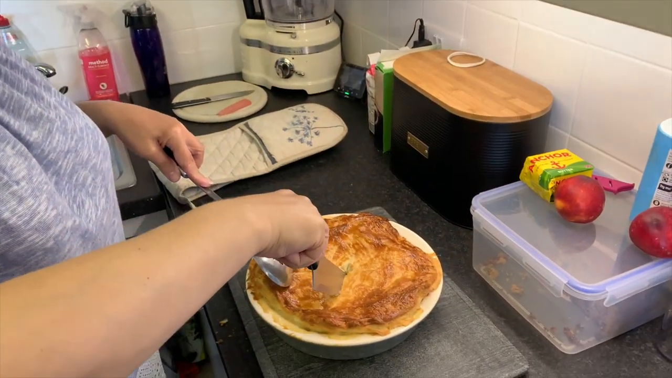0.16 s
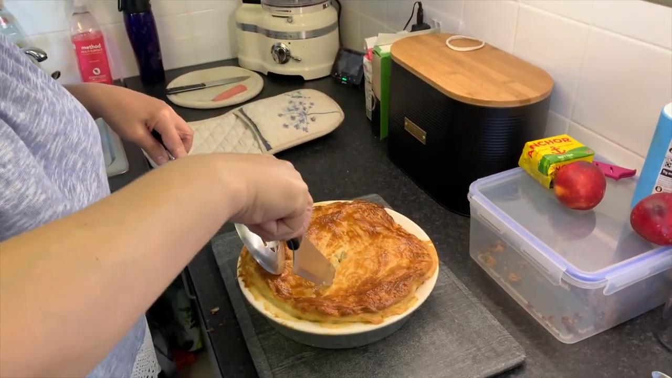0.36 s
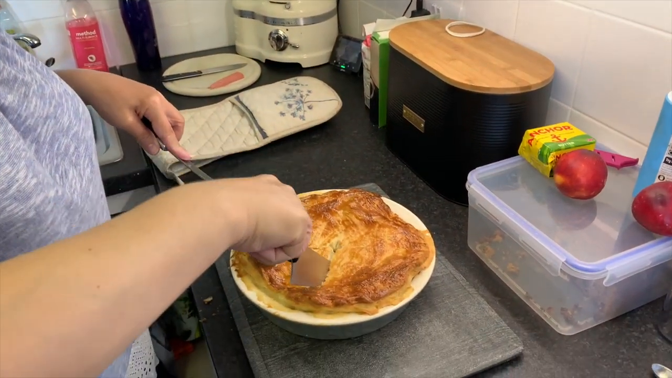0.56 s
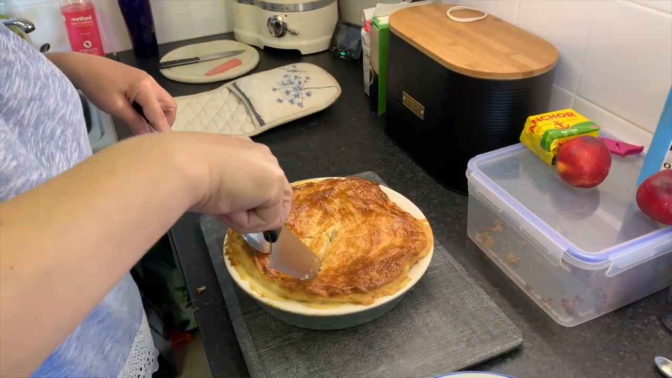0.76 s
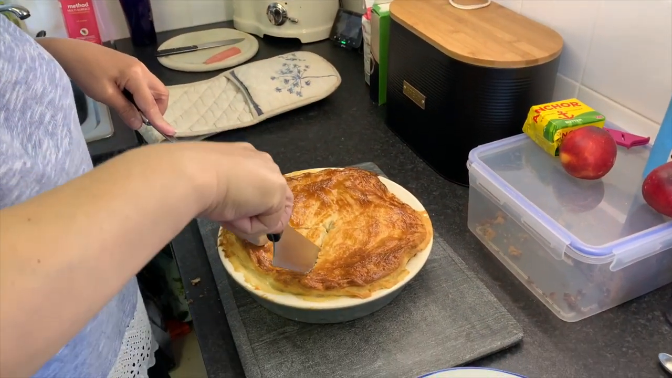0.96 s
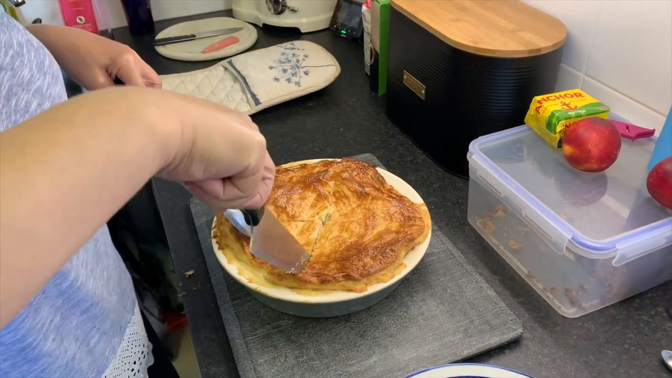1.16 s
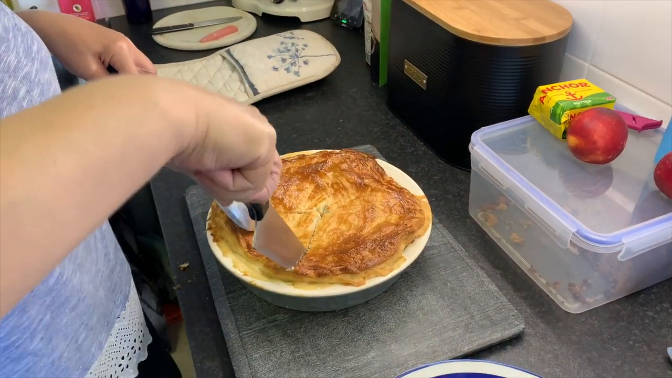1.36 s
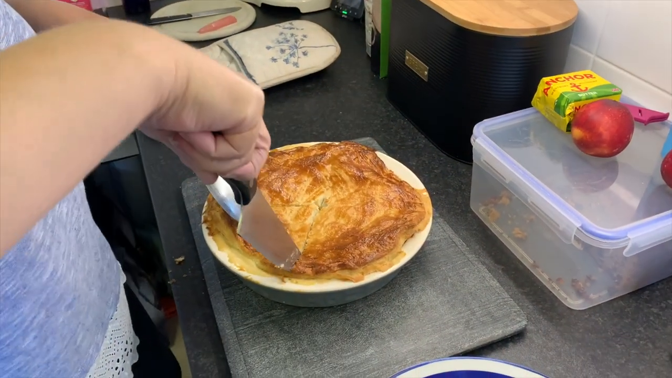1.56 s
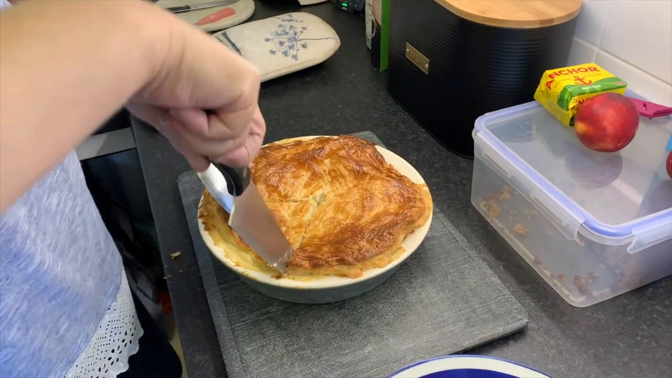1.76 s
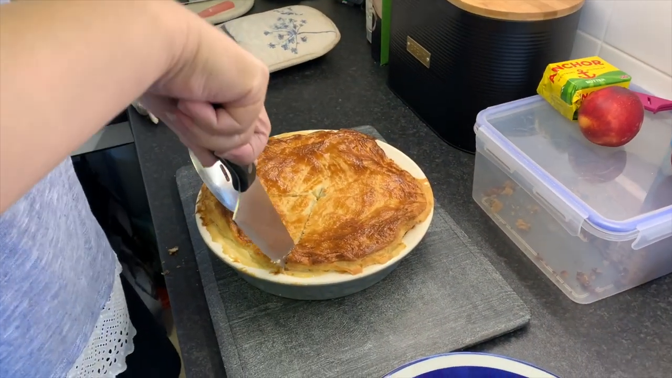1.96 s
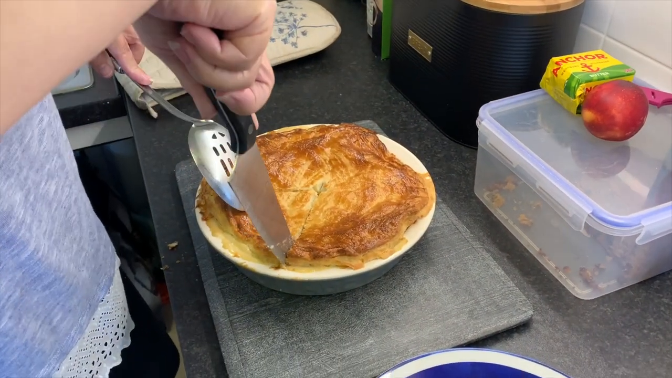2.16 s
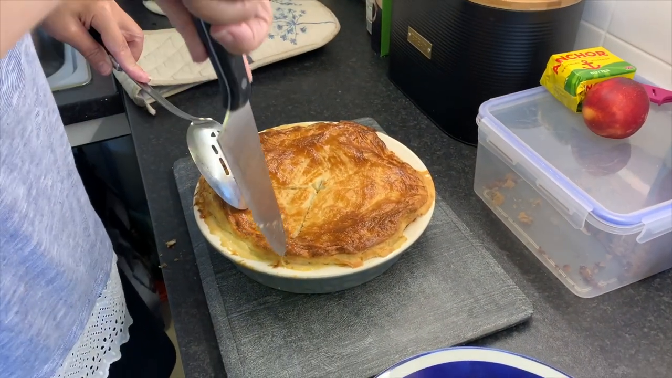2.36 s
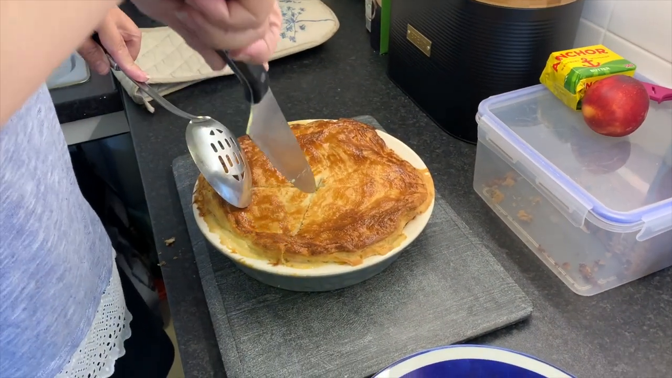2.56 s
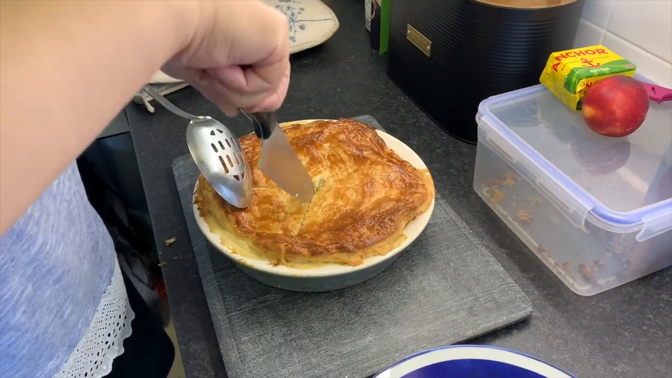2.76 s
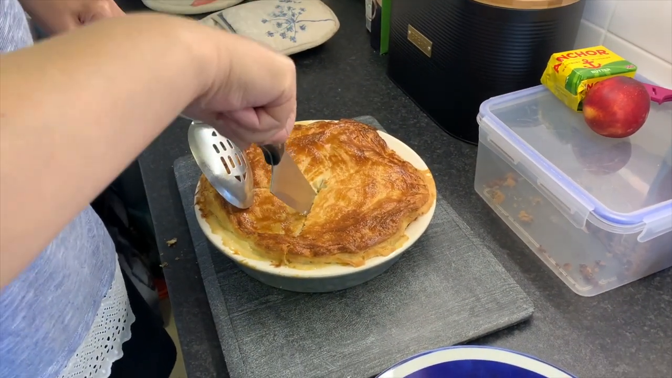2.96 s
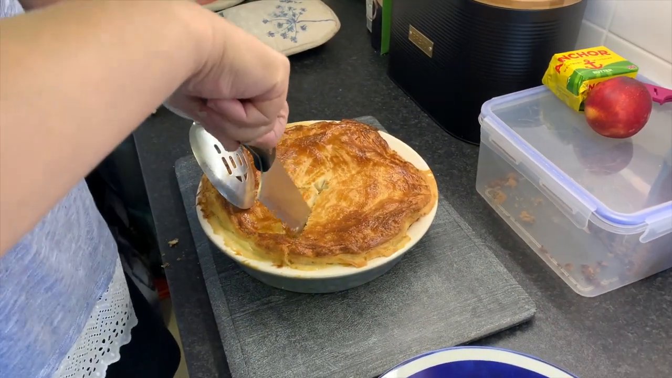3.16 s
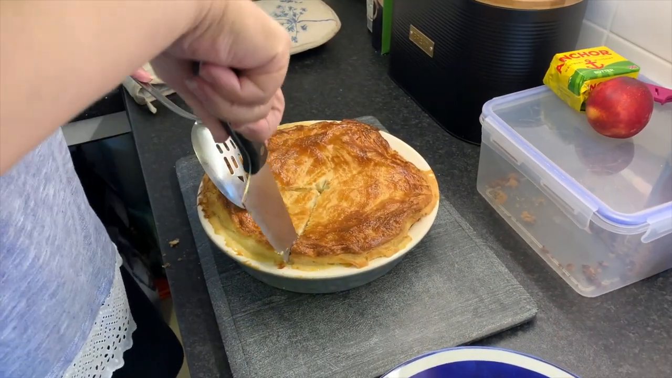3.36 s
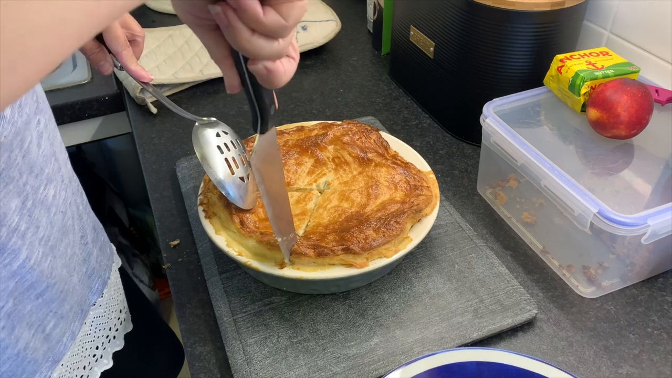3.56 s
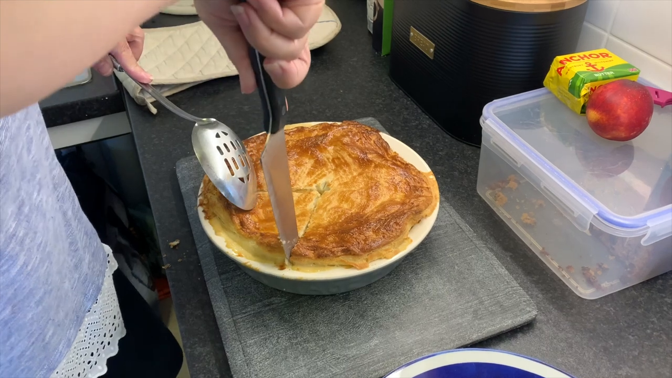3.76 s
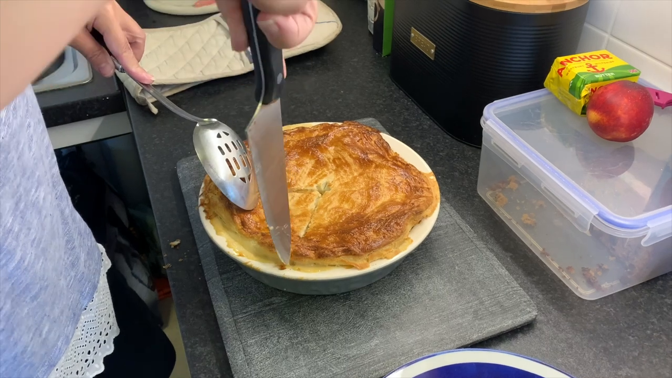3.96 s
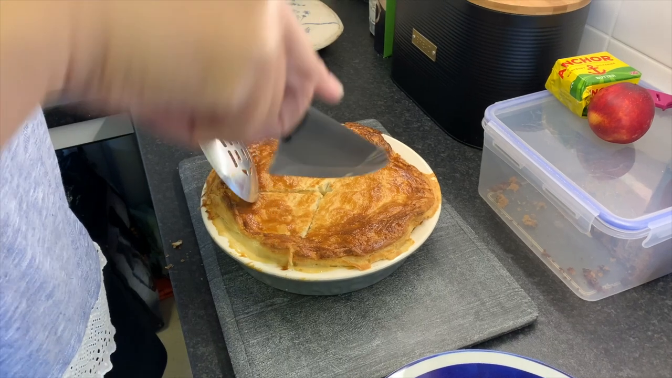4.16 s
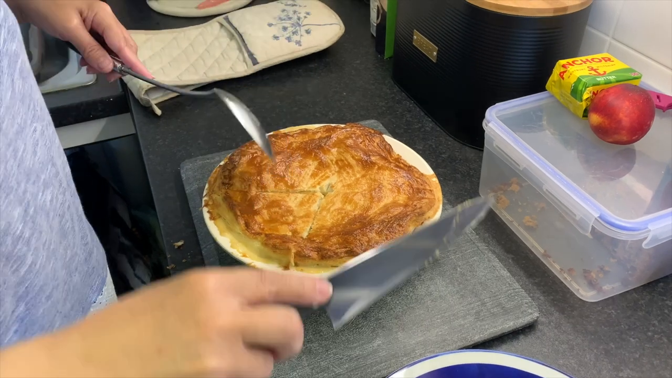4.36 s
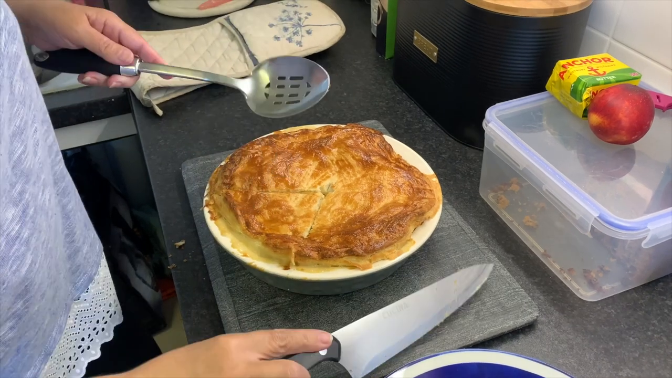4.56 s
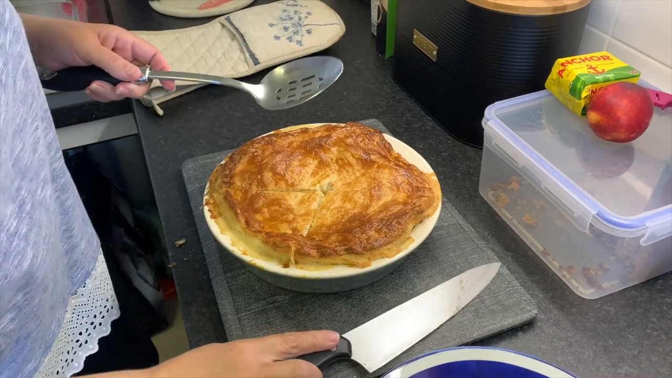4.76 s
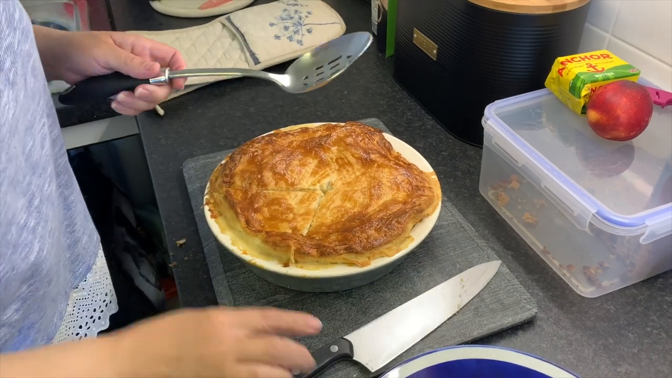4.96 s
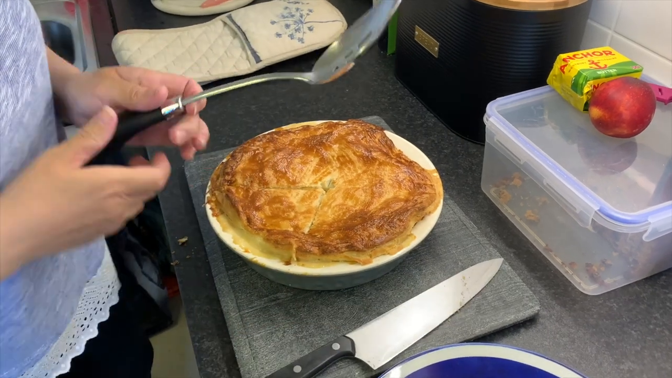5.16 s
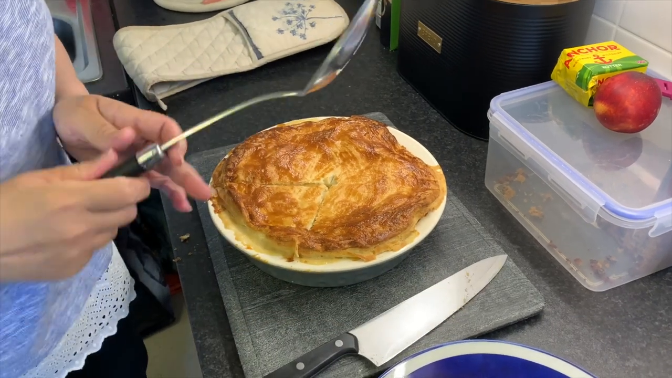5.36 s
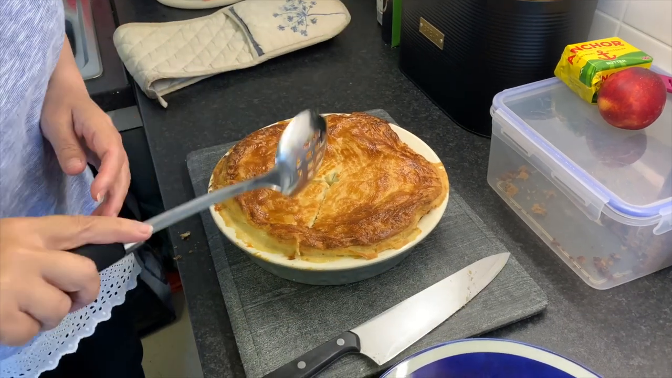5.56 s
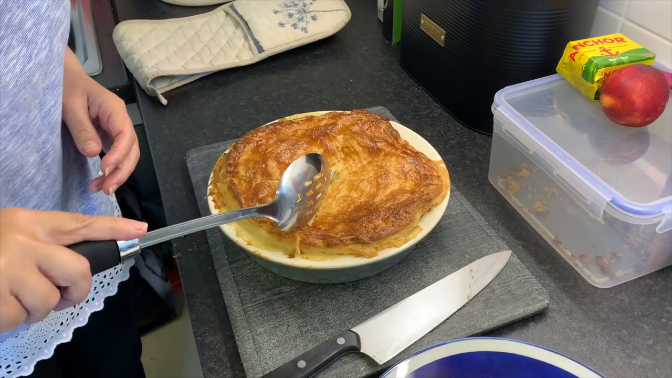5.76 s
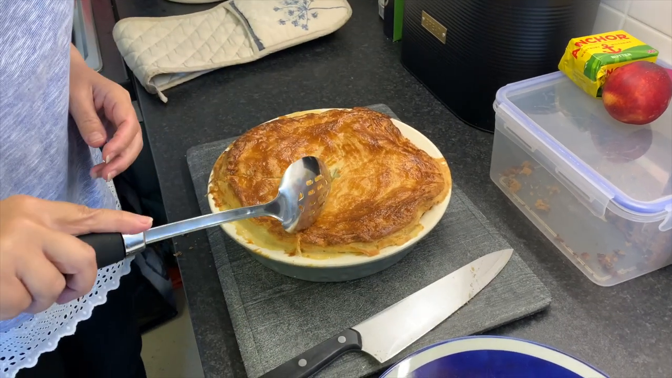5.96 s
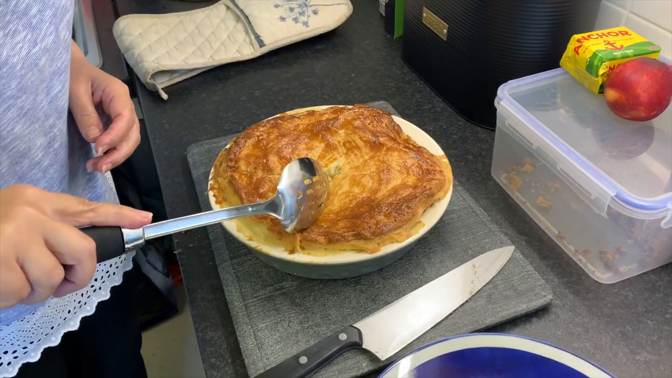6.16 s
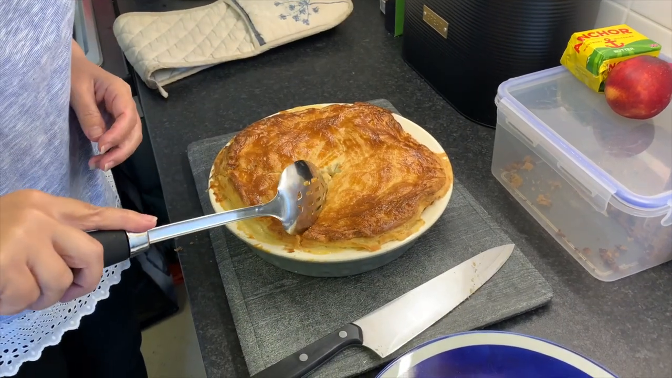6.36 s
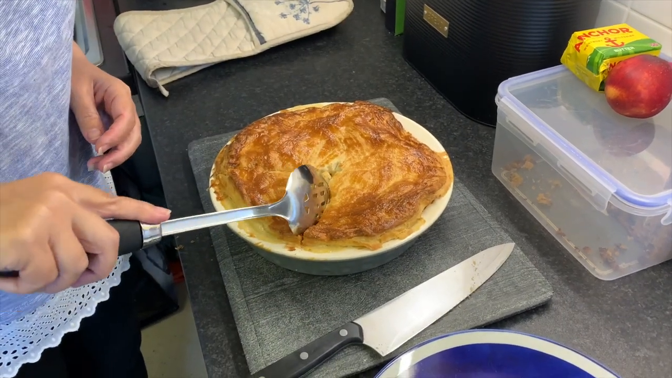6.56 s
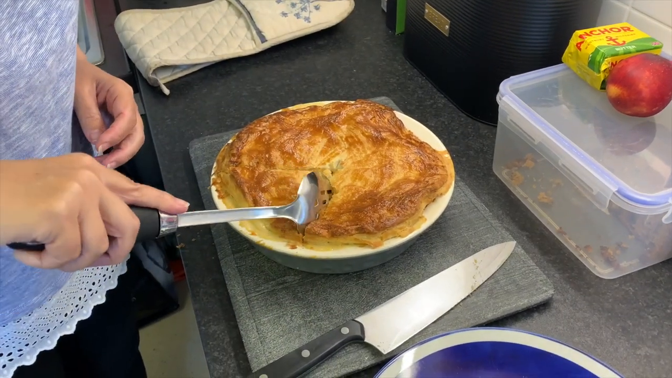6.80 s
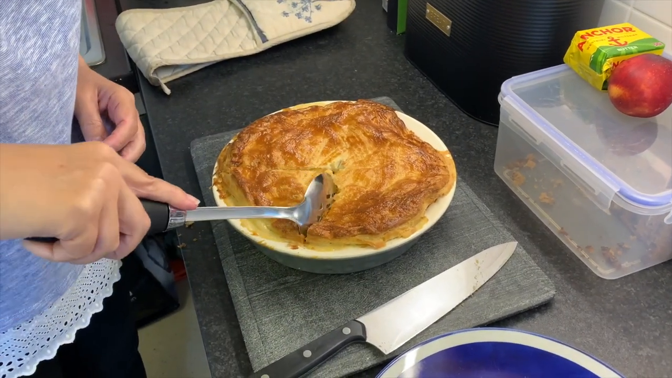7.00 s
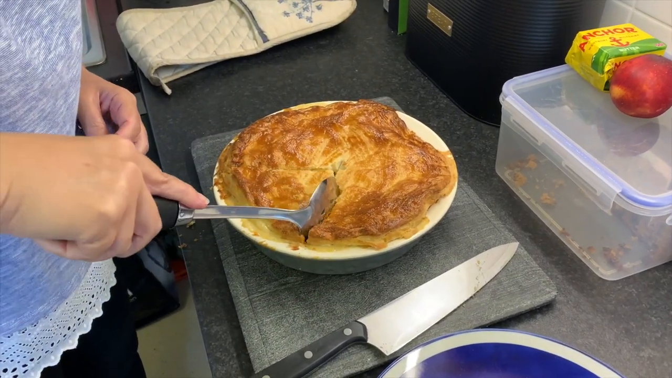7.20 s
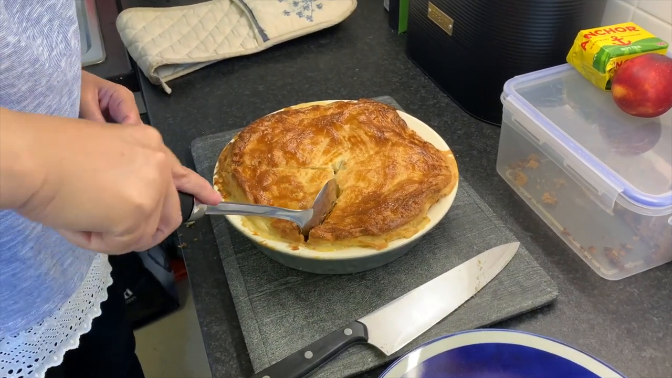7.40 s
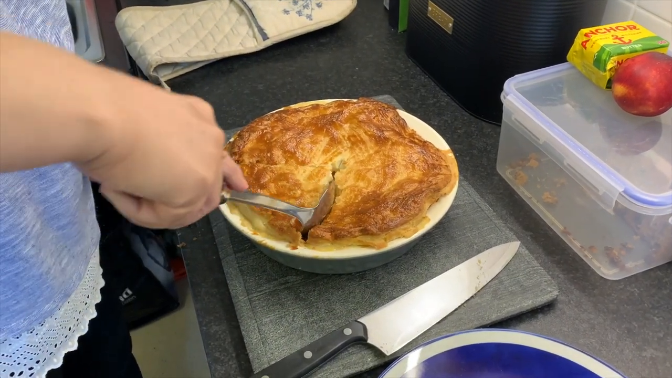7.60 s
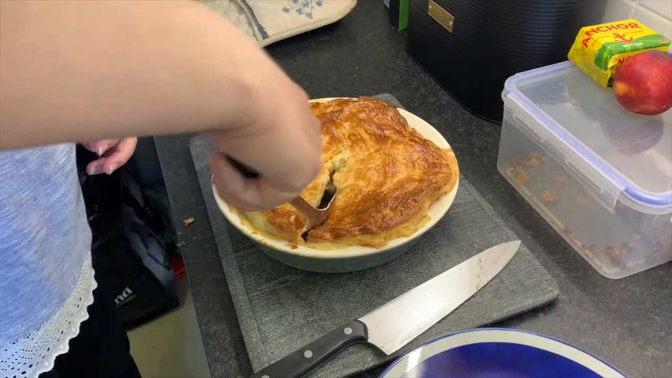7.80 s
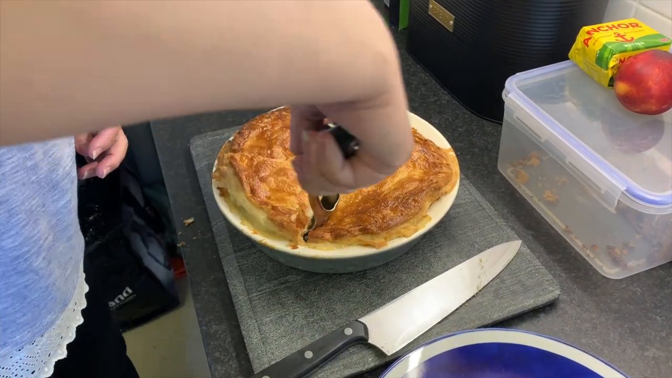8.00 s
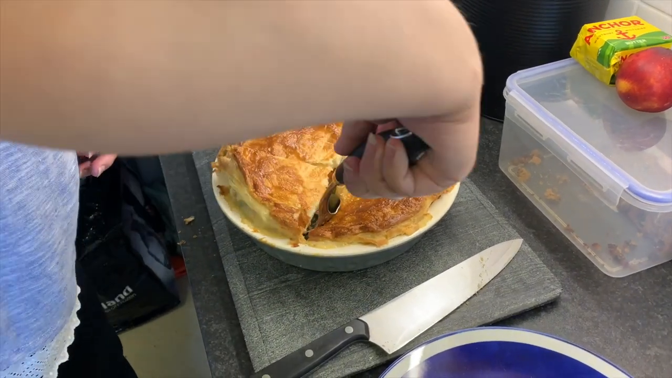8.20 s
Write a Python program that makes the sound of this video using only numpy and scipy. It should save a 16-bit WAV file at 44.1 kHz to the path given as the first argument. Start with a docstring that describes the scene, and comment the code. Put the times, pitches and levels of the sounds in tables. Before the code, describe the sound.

Close by in a kitchen with a low, steady appliance hum, a knife crunches through flaky baked pastry, each stroke ending in a knock on the ceramic dish. The blade scrapes and clicks against the dish several more times, then clatters lightly onto a cutting board. After a short pause, a metal spoon breaks into the crust with quieter, dry crackling and small snapping flakes.

```python
"""Cutting a crisp pie

A knife saws through the crust; its tip knocks and scrapes on the ceramic dish. The knife is laid on a
board, then a steel spoon breaks into the crust. Crumbs are filtered clicks, blows ring damped modes,
scrapes are stick-slip. The worktop thuds, an appliance hums, tiled walls ring briefly; two microphone
ports a little apart pick it up."""
import sys
import numpy as np
from scipy import signal
from scipy.fft import rfft, irfft
from scipy.io import wavfile
from scipy.ndimage import uniform_filter1d

SR = 44100
rng = np.random.default_rng(int(sys.argv[2]) if len(sys.argv) > 2 else 0)


def wrap_up_sound(samples):
    """Save the sound to the file named by the first command line argument, as 16-bit audio."""
    columns = np.atleast_2d(samples).T
    # keep every value between -1 and 1, then stretch to whole-number steps
    tamed = np.clip(columns, -1, 1)
    steps = np.round(tamed * 32767).astype(np.int16)
    wavfile.write(sys.argv[1], SR, steps)


N = 363384

# Spectrum of breaking crust. Each row: frequency in Hz, relative density in dB.
CRUST_SPECTRUM = [(400, -1), (2000, -1.5), (3500, -1), (6000, 0.5), (10000, 1.5), (13800, -3.5),
                  (14800, -9.5), (16000, -50)]
# Modes of the filled dish. Each row: frequency in Hz, gain in dB, t60 in seconds.
DISH_MODES = [(380.6, 6.5, 0.033), (453, 1.5, 0.054), (588, -5.5, 0.065), (689.5, -4.5, 0.097),
              (855, 0.5, 0.023), (1030, 3, 0.014), (1118.5, 2.5, 0.055), (1406, 6, 0.014),
              (1546, 10.5, 0.017), (1843, 11.5, 0.015), (2019, 9.5, 0.017), (2178, 3.5, 0.044),
              (2520, -1, 0.019), (2878, -2.5, 0.034), (3820, 5, 0.0086), (4495, 4, 0.0062),
              (6150, 4, 0.0021)]


def undb(db):
    return 10 ** (np.asarray(db) / 20)


def level(x, rms_db):
    return x * undb(rms_db) / np.sqrt(np.mean(x ** 2))


def butter(order, hz, kind="low"):
    return signal.butter(order, hz, kind, fs=SR, output="sos")


def curve(rows):
    """Gain over time from (s, dB) rows, silent outside them."""
    s, db = np.transpose(rows)
    span = np.arange(max(int(s[0] * SR), 0), min(int(s[-1] * SR), N))
    gain = np.zeros(N)
    gain[span] = undb(np.interp(span / SR, s, db))
    return gain


def colour(x, spectrum):
    """Filter by (Hz, dB) rows."""
    hz, db = np.transpose(spectrum)
    bin_hz = np.maximum(np.fft.rfftfreq(N, 1 / SR), 1)
    gain_db = np.interp(np.log(bin_hz), np.log(np.maximum(hz, 1)), db)
    return irfft(rfft(x) * undb(gain_db), N)


def ring(x, hz, t60_s):
    """One damped mode."""
    pole = np.exp(2j * np.pi * hz / SR - np.log(1000) / (t60_s * SR))
    return signal.lfilter([1], [1, -pole], x).imag


def bursts(times_s, gains, tau_s):
    """Envelope that jumps at each time and decays."""
    jumps = np.zeros(N)
    np.add.at(jumps, np.clip((np.asarray(times_s) * SR).astype(int), 0, N - 1), gains)
    return signal.lfilter([1], [1, -np.exp(-1 / (tau_s * SR))], jumps)


def surges(count):
    """Uneven little surges over a steady base."""
    times_s = rng.random(count) * N / SR
    return 0.37 + bursts(times_s, 0.5 * undb(2 * rng.exponential(size=count)), tau_s=0.0075)


def strokes(rows, attack_s, swell_db, release_s):
    """Gain of contacts that rise, swell and die away, from (start s, length s, end dB) rows."""
    return sum(curve([(s - attack_s, db - swell_db - 60), (s, db - swell_db),
                      (s + length_s, db), (s + length_s + release_s, db - 60)])
               for s, length_s, db in rows)


def grit(scatter_db, density):
    """Dense random clicks of very uneven size, rms 1."""
    size = undb(scatter_db * np.minimum(rng.exponential(size=N), 5.5))
    return level(size * (rng.random(N) < density) * rng.standard_normal(N), 0)


def blows(events, modes, rise_s, fall_s, roughness, gain_db):
    """Brief forces ring the modes; each striking spot shifts their levels and pitches."""
    out = np.zeros(N + SR)
    t = np.arange(int(max(mode[2] for mode in modes) * SR) + 1500) / SR
    force = np.exp(-t / fall_s) - np.exp(-t / rise_s)
    for s, blow_db, bass_db, treble_db in events:
        at = int(s * SR)
        for hz, mode_db, t60_s in modes:
            tilt_db = bass_db if hz < 950 else treble_db if hz > 2800 else 0
            spot_db, detune = rng.standard_normal(2) * (1.8, 0.02)
            pitch_hz = hz * (1 + detune)
            firm = np.exp(2j * np.pi * (pitch_hz * t + rng.random()))
            chatter = roughness * rng.standard_normal(len(t))
            sound = ring(force * (firm + chatter), pitch_hz, t60_s)
            sound *= np.sqrt(t60_s * SR * np.sum(force ** 2) / np.sum(sound ** 2))  # energy follows force
            out[at:at + len(t)] += undb(blow_db + tilt_db + mode_db + spot_db) * sound
    return undb(gain_db) * out[:N]


def cracks(events, rise_s, fall_s, gain_db):
    """The dry, pitchless contact noise of each blow."""
    # Each row: frequency in Hz, relative density in dB.
    spectrum = [(200, 9), (500, 6.5), (2000, 9.5), (5000, -10), (12000, -15), (14800, -25.5), (16000, -37)]
    s, db = np.transpose(events)[:2]
    envelope = bursts(s, undb(db), fall_s) - bursts(s, undb(db), rise_s)
    return level(colour(rng.standard_normal(N), spectrum), gain_db) * envelope


def room_air():
    """Low room noise, more alike at the two ports in the bass."""
    # Each row: frequency in Hz, relative density in dB.
    spectrum = [(25, -47), (60, -11), (114, -5.5), (354, -16), (911, -23.5), (2480, -39), (7000, -52.5),
                (13500, -53), (14600, -65), (15500, -77)]
    mid, side = (colour(rng.standard_normal(N), spectrum) for _ in range(2))
    side = colour(side, [(60, -2), (400, -5), (1200, 2)])
    gain = undb(-42.5) / np.std(signal.sosfilt(butter(2, 130, "high"), mid))
    return gain * (mid * undb([[-1.5], [1.3]]) + np.array([side, -side]))


def appliance_hum():
    """Wavering lines of narrowband noise, louder on the right."""
    # Each row: frequency in Hz, bandwidth in Hz, relative level in dB.
    lines = [(67.4, 7.4, -37.5), (103.3, 10.5, -30.5), (259.4, 4.9, -50.5), (303, 13, -50),
             (795, 2.2, -55.5)]
    hum = sum(level(ring(rng.standard_normal(N), hz, np.log(1000) / (np.pi * width_hz)), db)
              for hz, width_hz, db in lines)
    return level(hum, -32) * undb([[-2.5], [2.2]])


def tiled_walls(x, t60_s=0.35, gain_db=-10.5):
    """Dense, darkened tail: alike at both ports in the bass, unrelated above."""
    t = np.arange(int(0.6 * SR)) / SR
    mid, side = rng.standard_normal((2, len(t))) * np.exp(-np.log(1000) * t / t60_s) * (t > 0.004)
    side = signal.sosfilt(butter(1, 600, "high"), side)
    tail = signal.sosfilt(butter(1, [310, 4150], "band"), [mid + side, mid - side])
    tail = undb(gain_db) * tail / np.linalg.norm(tail[0])
    return signal.fftconvolve(x[None], tail, axes=1)[:, :N]


def ports(x, left_db):
    """Direct sound reaches the two ports a little apart in phase, the left leading by up to about 1.7 radians
    in the treble; the bass leans right."""
    # Each row: frequency in Hz, lead of the left port in radians.
    phase_leads = [(0, 0.52), (2000, 1.35), (5000, 1.71), (9000, 1.74), (16000, 1.6)]
    hz, lead_rad = np.transpose(phase_leads)
    bin_hz = np.fft.rfftfreq(N, 1 / SR)
    bass_db = -0.25 / (1 + (bin_hz / 800) ** 2)
    shift = np.exp(0.5j * np.interp(bin_hz, hz, lead_rad)) * undb(bass_db + left_db / 2)
    return np.array([irfft(rfft(x) * shift, N), irfft(rfft(x) / shift, N)])


def worktop_thuds():
    """The worktop thuds just after a heavy blow, as dish or board rocks."""
    # Each row: start in seconds, relative level in dB.
    thuds = [(.1, -30.5), (.51, -23), (.91, -19), (1.279, -21.5), (1.64, -26), (1.733, -26), (1.985, -22),
             (2.279, -22.5), (3.694, -16.5), (3.721, -18.5), (4.656, -31), (4.92, -21.5), (4.974, -24),
             (5.009, -21.5)]
    # Each row: frequency in Hz, gain in dB, t60 in seconds.
    modes = [(67, 6.5, 0.06), (108, 4, 0.047), (154.6, 3.5, 0.2), (191.6, 0, 0.091)]
    events = [(s, db, 0, 0) for s, db in thuds]
    return blows(events, modes, rise_s=0.0023, fall_s=0.0052, roughness=4.6, gain_db=-30)


def knife_on_board():
    """The heel lands on the board, then the blade rattles flat."""
    # Each row: start in seconds, then relative level, bass gain and treble gain in dB.
    landings = [(4.6338, -18.5, 2.5, 5), (4.797, -40, -3, -1), (4.8891, -14.5, -13.5, -2.5),
                (4.9081, -30, -2, -22), (4.9402, -18.5, -7, -23), (4.9569, -19, -7.5, -2)]
    # Board and blade. Each row: frequency in Hz, gain in dB, t60 in seconds.
    modes = [(450, 3.5, 0.071), (527, 2.5, 0.061), (1088, 4.5, 0.018), (1660, -6, 0.015),
             (1920, -2.5, 0.013), (2445, -2.5, 0.016), (2730, 1.5, 0.017), (3540, 7, 0.011),
             (3940, -3, 0.0078), (4500, 6, 0.0047), (5230, 5.5, 0.0024), (10140, 3.5, 0.0032)]
    ringing = blows(landings, modes, rise_s=0.0003, fall_s=0.0017, roughness=9, gain_db=-26.5)
    return ringing + cracks(landings, rise_s=0.00057, fall_s=0.017, gain_db=-6)


def dish_scrapes():
    """Stick-slip of steel on glaze drives the dish, damped by the contact; light rubs squeak."""
    # Each row: start in seconds, length in seconds, relative end level in dB.
    drags = [(.795, 0.0085, -24), (1.8, 0.018, -25.5), (1.907, 0.0496, -14), (2.01, 0.12, -24.5),
             (2.278, 0.03, -16), (3.13, 0.17, -36.5), (3.425, 0.065, -29), (3.48, 0.044, -27),
             (3.625, 0.036, -15.5), (3.84, 0.033, -22), (3.885, 0.029, -18.5)]
    # Each row: start in seconds, length in seconds, end level in dB, pitch in Hz.
    rubs = [(3.14, 0.165, -39.5, 1640), (8.0, .19, -44, 3270)]
    shape = dict(attack_s=0.074, swell_db=8, release_s=0.072)
    slip = grit(scatter_db=1.8, density=0.1) * surges(600) ** 0.6
    body = sum((-1) ** k * undb(db) * ring(slip, hz, 0.59 * t60_s)
               for k, (hz, db, t60_s) in enumerate(DISH_MODES) if hz > 420)
    squeaks = sum(level(ring(slip, hz, t60_s=0.024), 0) * strokes([rub], **shape) for *rub, hz in rubs)
    return level(body, 0.58) * strokes(drags, **shape) + squeaks


def dish_knocks():
    """The knife tip, and at the end the spoon, strikes the dish and rings it."""
    # Each row: start in seconds, then relative level, bass gain and treble gain in dB.
    knocks = [(.0845, -14.5, 0, -0.5), (.4935, -9, 3, -1), (.8863, -7, -2, -0.5), (1.257, -7, 0.5, 0),
              (1.6197, -7, -0.5, 0), (1.7958, -22.5, -24, 1.5), (1.911, -18, -1, 1), (1.922, -17, 5, -5),
              (1.9645, -7.5, -2, 0), (2.0062, -19.5, -37, 9), (2.0991, -17.5, -11, 6),
              (2.1116, -19.5, -1, 8), (2.3074, -23.5, -4, 13.5), (2.9955, -13.5, -1.5, 0),
              (3.326, -14, -12, 0.5), (3.4711, -20.5, -9, 11.5), (3.4925, -17, -16, 8),
              (3.643, -11.5, -18, 2.5), (3.6565, -25, 11, -14), (3.6757, -10, 4.5, -7),
              (3.7843, -25, 0.5, 1.5), (3.806, -24.5, -8, 7), (8.015, -33.5, 7, -9)]
    ringing = blows(knocks, DISH_MODES, rise_s=0.001, fall_s=0.0019, roughness=8.6, gain_db=-28)
    return ringing + cracks(knocks, rise_s=0.0019, fall_s=0.011, gain_db=-2.3)


def flake_snaps(weak_db=-24.5):
    """Single flakes snap in bursts of noise; weak ones have less body."""
    # Each row: start in seconds, relative level in dB.
    snaps = [(0.611, -30), (0.768, -25), (0.848, -21.5), (1.552, -31), (2.397, -28.5), (2.8788, -30),
             (6.091, -31.5), (6.244, -30), (6.3393, -25.5), (6.4027, -19.5), (6.432, -29.5),
             (6.5286, -25.5), (6.706, -28), (6.724, -27.5), (6.842, -26.5), (6.892, -26.5), (6.917, -32),
             (7.103, -29), (7.14, -31.5), (7.177, -31), (7.233, -25.5), (7.3295, -25.5), (7.545, -24),
             (7.61, -26), (7.777, -30), (7.835, -30.5), (7.879, -27.5), (7.921, -30), (8.0194, -26),
             (8.122, -24), (8.173, -21)]
    s, db = np.transpose(snaps)
    noise = level(colour(rng.standard_normal(N), CRUST_SPECTRUM), 1.3)
    body = signal.sosfiltfilt(butter(2, 6200), noise)
    body_gain = undb(db + np.minimum(db - weak_db, 0))
    body_envelope = bursts(s, body_gain, 0.015) - bursts(s, body_gain, 0.00041)
    return (noise - body) * bursts(s, undb(db), 0.008) + body * body_envelope


def shards(count, low_hz=2200, high_hz=14000, q=5):
    """Scattered shards of uneven size, each a brief ring on its own pitch; rms 1."""
    when, pitch, size = rng.random((count, 3)).T[:, :, None]
    hz = low_hz * (high_hz / low_hz) ** pitch
    age = np.arange(256)
    cycles = hz * age / SR
    gain = undb(-3.5 * np.log(np.maximum(size, 0.002)))
    rings = gain * np.sin(2 * np.pi * cycles) * cycles * np.exp(-cycles * np.pi / q)
    at = (when * N).astype(int) + age
    return level(np.bincount(at.ravel(), rings.ravel(), minlength=N)[:N], 0)


def crumbs(splits_hz=(1300, 2600, 5200, 10400)):
    """Large crumbs sound low, small ones high; each size surges partly alone."""
    grain = colour(grit(scatter_db=2.25, density=0.4), CRUST_SPECTRUM)
    together = surges(500) ** 0.35
    below = [0] + [signal.sosfiltfilt(butter(2, hz), grain) for hz in splits_hz] + [grain]
    return sum((upper - lower) * together * surges(900) ** (0.34 + 0.15 * k)
               for k, (lower, upper) in enumerate(zip(below, below[1:])))


def crust_cutting():
    """Knife strokes and spoon pressure crumble the crust; the crumbs ring the steel broadly."""
    # Blade pushed down through the crust, or skidding flat on the board.
    # Each row: start in seconds, length in seconds, relative end level in dB.
    pushes = [(0, 0.08, -29.5), (.412, 0.099, -31), (.768, 0.051, -46), (.852, 0.032, -23),
              (1.19, 0.064, -27), (1.553, 0.07, -32), (2.37, 0.0043, -40), (2.745, 0.27, -46.5),
              (4.895, 0.03, -28)]
    # Blade drawn back through its cut, blade ringing as it slides on the board, or a hand brushing past.
    # Each row: start in seconds, length in seconds, relative end level in dB, blade ring gain in dB.
    pulls = [(0.25, 0.12, -43, -1), (0.63, 0.18, -42, -16), (1.058, 0.1, -42, -5), (1.379, 0.12, -45, -6),
             (3.097, 0.17, -52.5, -25), (4.645, 0.19, -53, 2), (5.282, 0.052, -56.5, -19)]
    # Spoon pressing in. Each row: time in seconds, relative level in dB.
    presses = [(5.795, -68), (5.812, -41), (5.92, -51.5), (6.1, -44), (6.3, -45), (6.6, -39.5),
               (6.82, -42.5), (6.95, -34.5), (7.2, -47), (7.45, -48.5), (7.6, -49), (7.74, -54),
               (7.8, -47.5), (8.08, -42), (8.15, -35.5), (8.24, -42)]
    push = strokes(pushes, attack_s=0.049, swell_db=4, release_s=0.096)
    pull_shape = dict(attack_s=0.22, swell_db=-3.5, release_s=0.24)
    pull = strokes([row[:3] for row in pulls], **pull_shape)
    pull_ring = strokes([(s, length_s, db + ring_db) for s, length_s, db, ring_db in pulls], **pull_shape)
    spoon = curve(presses)
    clumps = level(uniform_filter1d(surges(200), size=900) ** 1.46, 0)  # crust gives way unevenly
    crumbling = crumbs()
    crunch = level(crumbling, 3.5) + undb(-3) * shards(4000)
    steel = level(ring(crumbling, hz=3700, t60_s=0.0061), 0)
    return crunch * (push + pull + clumps * spoon) + steel * (pull_ring + undb(-13) * spoon)


def scene():
    dish = dish_knocks() + dish_scrapes()
    board = knife_on_board()
    thuds = worktop_thuds()
    pie = crust_cutting() + flake_snaps()
    direct = ports(dish, -0.33) + ports(board, -0.99) + ports(thuds, -1.9) + ports(pie, 0.23)
    return direct + tiled_walls(dish + board + thuds + pie) + appliance_hum() + room_air()


def record(dry):
    """The microphone drops the deepest bass, clips at full scale and cuts the top."""
    clipped = np.clip(signal.sosfilt(butter(3, 48, "high"), dry), -1, 1)
    return signal.sosfilt(signal.ellip(8, 0.2, 80, 16400, fs=SR, output="sos"), clipped)


dry = scene()
out = record(dry)
wrap_up_sound(out)
```